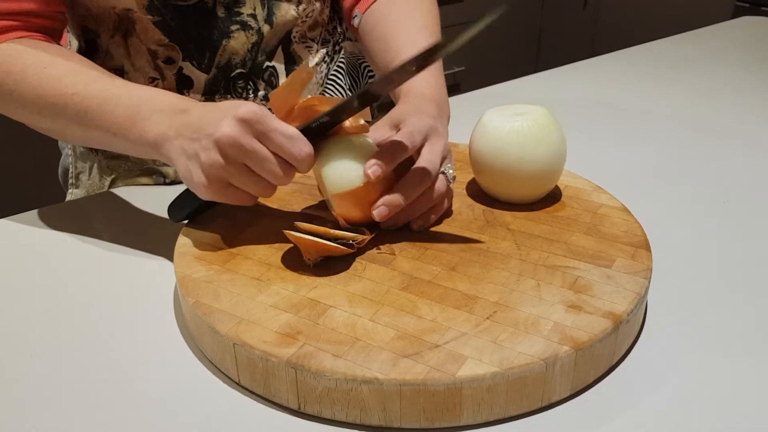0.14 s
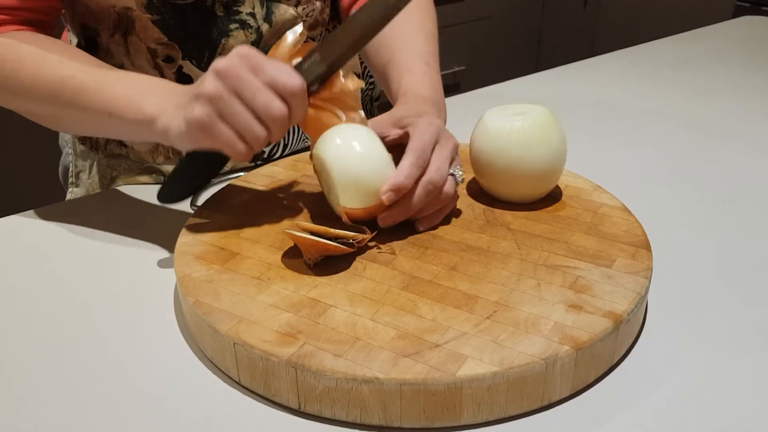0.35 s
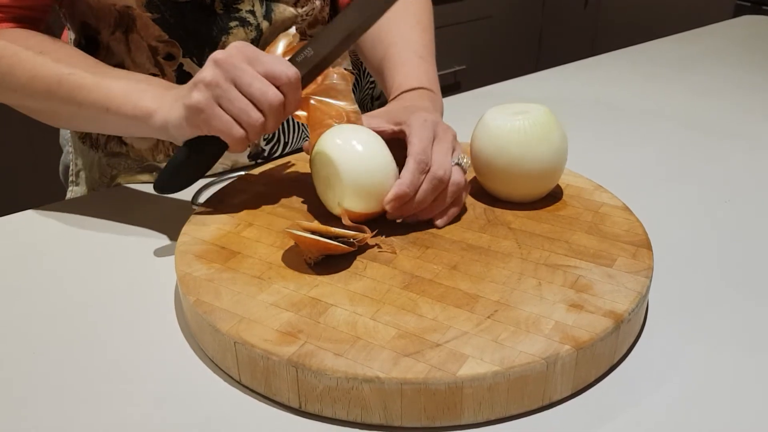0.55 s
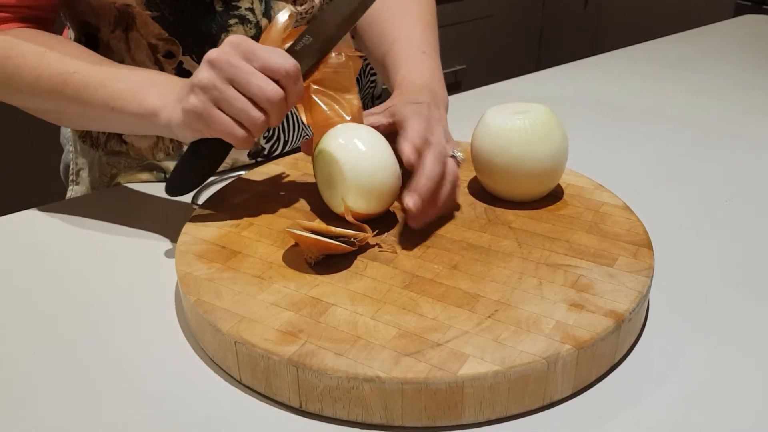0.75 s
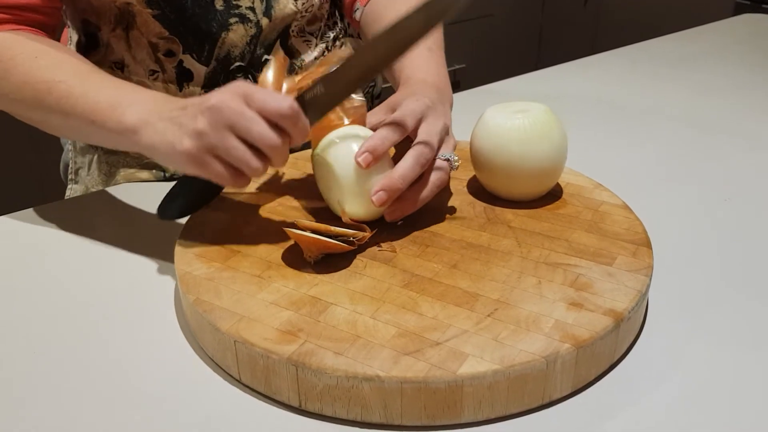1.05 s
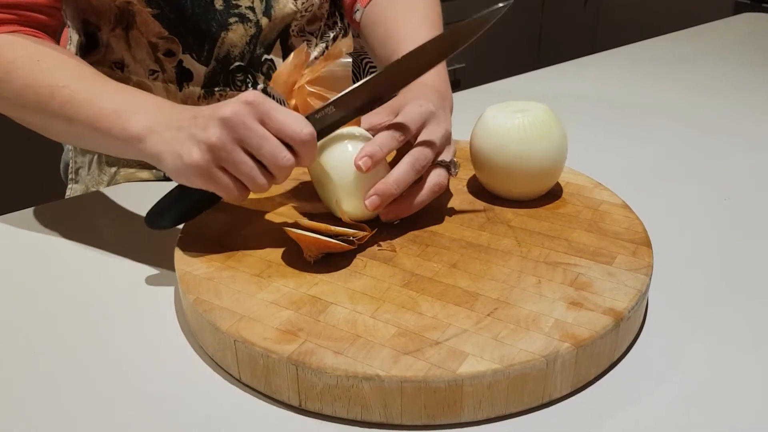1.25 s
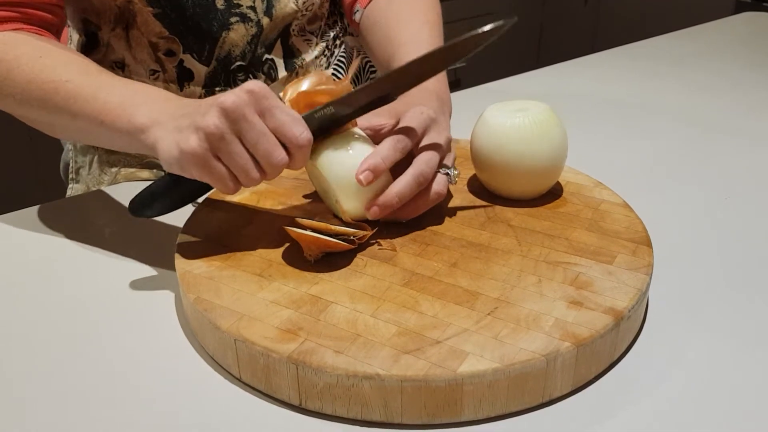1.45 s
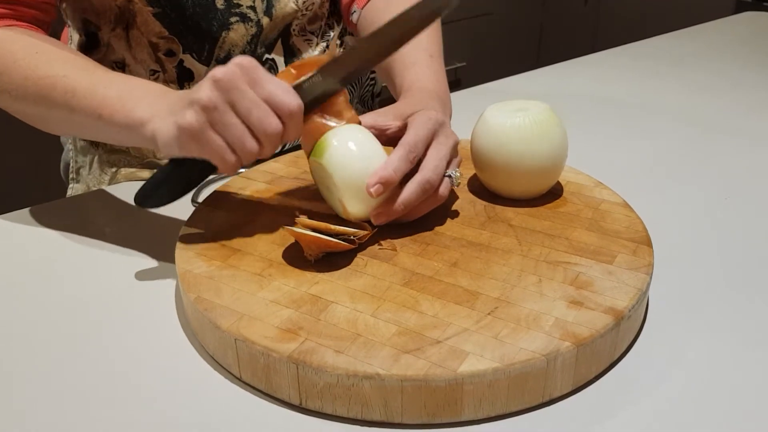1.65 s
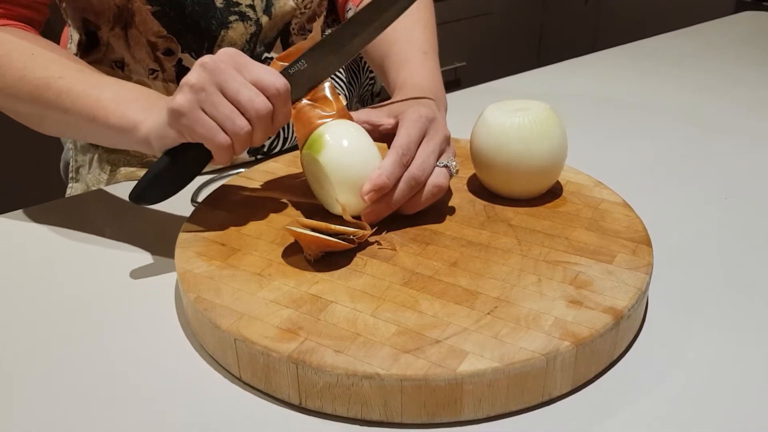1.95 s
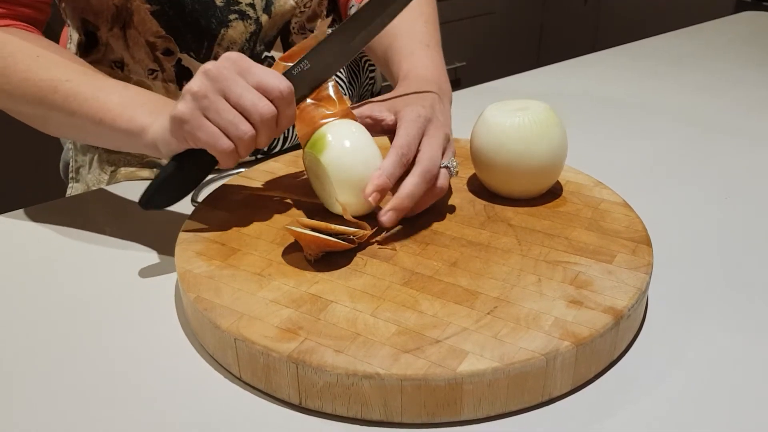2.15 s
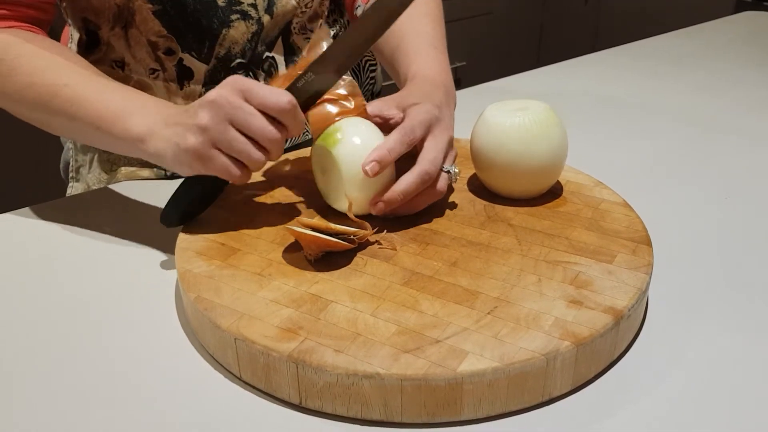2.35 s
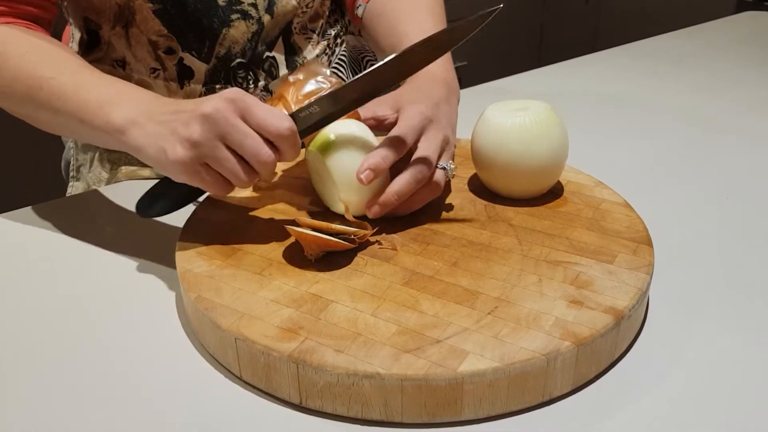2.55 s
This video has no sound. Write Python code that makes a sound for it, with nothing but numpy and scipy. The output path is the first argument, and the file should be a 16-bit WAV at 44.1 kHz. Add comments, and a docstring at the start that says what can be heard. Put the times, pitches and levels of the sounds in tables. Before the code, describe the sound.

Papery onion peel crackles early, thins to faint ticks, then snaps loudest past the middle; dull board thuds and a late wood knock follow, heard close up in a bare, reverberant room.

```python
"""A knife pulls the dry skin off an onion held on a thick wooden board, in a bare, ringing kitchen.
The skin snaps in single cracks and tears in runs of tiny ones, all made from short bursts of noise.
The board mirrors each of them, and they ring on in the room as slowly fading noise.
The onion scuffs the board (filtered noise) and bumps it, so board and table boom (fading sine waves).
Near the end there is one hard wooden knock: a few quick contacts, each a noise clack and ringing wood."""
import sys
import numpy as np
from scipy import signal
from scipy.fft import rfft, irfft
from scipy.io import wavfile

SR = 44100
rng = np.random.default_rng(int(sys.argv[2]) if len(sys.argv) > 2 else 0)


def pcm_store(signal):
    """Save signal as 16-bit PCM."""
    levels = np.round(np.clip(np.atleast_2d(signal), -1, 1) * 32767)
    wavfile.write(sys.argv[1], SR, levels.astype(np.int16).T)


N = 119070  # length of the sound in samples
WIDTH = 0.72  # share of the noise energy that differs between left and right
TOP_HZ = 15900  # upper limit of the sound


def undb(db):
    """Turn decibels into a gain."""
    return 10 ** (np.asarray(db) / 20)


def add(out, x, start):
    """Mix x into out from a given time in seconds."""
    i = max(int(start * SR), 0)
    n = max(min(x.shape[-1], N - i), 0)
    out[..., i:i + n] += x[..., :n]


def unit(x):
    """Scale each channel to an energy of one."""
    return x / np.sqrt(np.sum(x ** 2, axis=-1, keepdims=True) + 1e-20)


def filt(x, hz, kind, order=2):
    """Keep part of the spectrum with a Butterworth filter."""
    edges = np.clip(hz, 10, 0.45 * SR)
    return signal.sosfilt(signal.butter(order, edges, kind, fs=SR, output="sos"), x)


def curve(hz, table):
    """Read the second column of a table between its rows, on a log-frequency axis."""
    table = np.array(table)
    return np.interp(np.log(np.maximum(hz, 1)), np.log(table[:, 0]), table[:, 1])


def stereo_noise(n):
    """White noise that is partly shared by left and right."""
    shared, left, right = rng.standard_normal((3, n))
    return np.sqrt(1 - WIDTH) * shared + np.sqrt(WIDTH) * np.array([left, right])


def coloured(n, table):
    """Stereo noise whose spectrum follows a table."""
    gain = undb(curve(np.fft.rfftfreq(n, 1 / SR), table))
    return irfft(rfft(stereo_noise(n)) * gain, n)


# Spectrum of the steady hiss and hum. Each row: frequency in Hz, relative level in dB per Hz.
HISS_AND_HUM = [(25, 6), (70, -2), (200, -11.5), (600, -17), (2000, -27.5), (8000, -22), (16000, -24)]
FLOOR_DB = -68


def floor():
    """Faint steady room noise, stronger in the bass."""
    return unit(coloured(N, HISS_AND_HUM)) * np.sqrt(N) * undb(FLOOR_DB)


# How the kitchen rings. Each row: frequency in Hz, time to fade by 60 dB in seconds, relative level in dB.
KITCHEN = [(99, 0.31, -10), (337, 0.51, -6.5), (900, 0.56, 0), (2380, 0.58, -2), (3780, 0.52, 4),
           (5940, 0.77, -6.5), (8560, 0.6, -0.5), (11100, 0.47, -2), (17300, 0.5, -15.5)]
ROOM_DB, ROOM_GAP_S, ROOM_RISE_S = -1, 0.0013, 0.0055


def kitchen(x):
    """Hard walls return a dense tail of noise, shortest in the bass and there alike on both sides."""
    t, hz = np.arange(SR) / SR, np.fft.rfftfreq(SR, 1 / SR)
    shared = rfft(rng.standard_normal(SR))
    own = rfft(rng.standard_normal((2, SR)))
    alike = 1 / (1 + (hz / 480) ** 4)
    noise = np.sqrt(alike) * shared + np.sqrt(1 - alike) * own
    onset = 1 - np.exp(-np.maximum(t - ROOM_GAP_S, 0) / ROOM_RISE_S)
    centres = np.array(KITCHEN)[:, 0]
    tail = 0
    # each row shapes its own band, which blends into the neighbouring ones
    for (_, t60, db), pick in zip(KITCHEN, np.eye(len(KITCHEN))):
        band = irfft(noise * curve(hz, np.column_stack([centres, pick])), SR)
        tail = tail + undb(db) * band * unit(onset * undb(-60 * t / t60))
    return undb(ROOM_DB) * signal.fftconvolve(x, tail, axes=1)[:, :N]


MIRROR_S, MIRROR_LEFT_DB, MIRROR_RIGHT_DB = 0.0021, -16.5, -17


def mirror(x):
    """The board throws the skin sounds back a moment later."""
    lag = int(MIRROR_S * SR)
    echo = np.pad(x, ((0, 0), (lag, 0)))[:, :N]
    return x + undb(np.array([[MIRROR_LEFT_DB], [MIRROR_RIGHT_DB]])) * echo


# Onion and fingers scuffing the board. Each row: start in seconds, length in seconds, level in dB,
# resonance in Hz, upper limit of the grit in Hz.
SCUFF_EVENTS = [(0.013, 0.015, -62, 343, 1550), (0.176, 0.006, -48, 367, 950),
                (0.18, .014, -63.5, 384, 960), (0.193, 0.078, -53.5, 312, 1080),
                (0.248, 0.06, -53.5, 323, 900), (0.304, 0.014, -43.5, 329, 1100),
                (0.451, 0.032, -52, 367, 520), (0.487, 0.021, -46.5, 347, 410),
                (0.507, .022, -44, 256, 384), (0.923, 0.016, -70.5, 376, 605),
                (1.181, 0.012, -68, 365, 600), (1.301, 0.01, -55.5, 272, 920),
                (1.416, 0.078, -74, 360, 725), (1.645, 0.07, -65.5, 377, 900),
                (1.689, 0.013, -53.5, 357, 700), (2.266, 0.017, -61, 383, 1100)]
SLIPS_PER_S, SCUFF_WIDTH_HZ, SCUFF_GRIT_DB = 700, 142, -8.5


def scuffs():
    """The onion sticks and slips on the wood: random ticks and noise give a short, hollow rub."""
    out, t = np.zeros((2, N)), np.arange(8192) / SR
    for start, length, db, hz, bright_hz in SCUFF_EVENTS:
        slips = rng.random(len(t)) < SLIPS_PER_S / SR
        fade = np.clip((length - t) / (0.12 * length), 0, 1)
        drag = (slips + 0.077 * stereo_noise(len(t))) * fade
        edges = [hz - SCUFF_WIDTH_HZ / 2, hz + SCUFF_WIDTH_HZ / 2]
        body = unit(filt(drag, edges, "bandpass"))
        grit = unit(filt(filt(drag, 162, "highpass", order=3), bright_hz, "lowpass", order=5))
        rub = unit(body + undb(SCUFF_GRIT_DB) * grit)
        # longer scuffs get more energy, so the level stays comparable
        add(out, undb(db) * np.sqrt(length * SR) * rub, start)
    return out


# Onion pressed or bumped on the board. Each row: start in seconds, level in dB, contact time in seconds.
BUMP_EVENTS = [(.02, -44.5, 0.0084), (0.136, -52.5, .01), (.275, -54.5, 0.0024), (.519, -27.5, 0.0051),
               (.545, -28, 0.0068), (0.744, -60, 0.0089), (0.87, -60, .011), (1.27, -37, 0.0063),
               (1.397, -46, 0.0091), (1.639, -68, 0.0094), (1.753, -33, 0.0063), (2.139, -58, 0.01),
               (2.358, -44, 0.0041), (2.649, -43.5, 0.0099)]
# Ringing tones of board and table together.
# Each row: frequency in Hz, relative level in dB, time to fade by 60 dB in seconds.
BOARD_AND_TABLE = [(61.23, -0.5, 0.37), (88.04, 5, 0.27), (121.8, -5, 0.22), (179.5, 1, 0.11),
                   (257.7, -1.5, 0.12), (305, -0.5, 0.13)]
TABLE_RISE_S = 0.0036


def bumps():
    """The soft onion pushes the board; board and table boom in fading low tones."""
    out, t = np.zeros(N), np.arange(SR // 2) / SR
    ring = np.zeros(len(t))
    for k, (hz, db, t60) in enumerate(BOARD_AND_TABLE):
        swing = (-1) ** k  # neighbouring tones swing against each other
        ring += swing * undb(db - 60 * t / t60) * np.sin(2 * np.pi * hz * t)
    ring = ring * (1 - np.exp(-t / TABLE_RISE_S))
    for start, db, contact in BUMP_EVENTS:
        push = np.sin(np.pi * np.minimum(t / contact, 1)) ** 2
        boom = signal.fftconvolve(ring, push / push.sum())[:len(t)]
        add(out, undb(db) * boom, start)
    return out * undb(np.array([[1.1], [-1.1]]))  # slightly louder on the left


# Contacts on hard wood. Each row: start in seconds, level in dB, upper limit of the sound in Hz.
KNOCK_EVENTS = [(2.3634, -4.5, 2630), (2.366, -6, 2130), (2.398, -11, 2190)]
# Ringing tones of the wood.
# Each row: frequency in Hz, relative level in dB, time to fade by 60 dB in seconds.
WOOD_TONES = [(136.5, -8, 0.28), (183, -2, 0.18), (249.4, -1, 0.12), (304.1, -2, 0.13), (355, 1, 0.074),
              (416, -2, 0.074), (655, -3.5, 0.045), (970, 6, 0.014), (1139, -0.5, 0.038),
              (1288, -1.5, 0.025), (1540, 5, 0.023), (1910, -47, .025), (2400, -2, 0.026)]
# Spectrum of the dull clack of the contact. Each row: frequency in Hz, relative level in dB per Hz.
CLACK_SPECTRUM = [(60, -28), (170, 4), (350, 8.5), (620, -0.5), (830, -18), (1150, 1.5), (1600, 0.5),
                  (2100, -15), (3500, -10.5), (8000, -13)]
WOOD_DB, CLACK_DB, CLACK_S = -25.5, 4.5, 0.0045
MODE_SPREAD_HZ = 690  # tones well below this reach both sides nearly in phase


def knocks():
    """A hard contact gives a noisy clack and sets the wood ringing in many short tones."""
    out, t = np.zeros((2, N)), np.arange(SR // 4) / SR
    for start, db, bright_hz in KNOCK_EVENTS:
        ring = np.zeros((2, len(t)))
        for hz, tone_db, t60 in WOOD_TONES:
            phase = min((hz / MODE_SPREAD_HZ) ** 2, 2) * rng.standard_normal((2, 1))
            ring += undb(tone_db - 60 * t / t60) * np.sin(2 * np.pi * hz * t + phase)
        clack = unit(coloured(len(t), CLACK_SPECTRUM) * np.exp(-t / CLACK_S))
        knock = undb(WOOD_DB) * ring + undb(CLACK_DB) * clack
        add(out, undb(db) * filt(knock, bright_hz, "lowpass", order=3), start)
    return filt(out, 120, "highpass")


# Limits of the three skin bands, in Hz: top of the low mids, both edges of the presence band
# (the clear upper middle), foot of the treble.
SKIN_BANDS = (3200, 4000, 6940, 9980)


def flake(x, levels_db, lowest_hz):
    """A flake of skin radiates three broad bands, and little below a limit set by its size."""
    low_top, mid_foot, mid_top, treble_foot = SKIN_BANDS
    bands = [(min(lowest_hz, 0.75 * low_top), low_top), (mid_foot, mid_top), (treble_foot, TOP_HZ)]
    out = 0
    for db, (lo, hi) in zip(levels_db, bands):
        share = np.sqrt((hi - lo) / (SR / 2))  # wider bands carry more energy
        out = out + undb(db) * share * unit(filt(x, [lo, hi], "bandpass"))
    return out


# Tearing and rubbing of the skin. Each row: start in seconds, length in seconds, low-mid level in dB,
# presence level in dB, treble level in dB, lowest frequency in Hz.
TEAR_EVENTS = [(0.01, 0.014, -44, -42, -43, 686), (0.021, 0.017, -50, -40, -61, 1000),
               (.252, 0.085, -37.5, -37, -71, 296), (0.305, .024, -31, -31.5, -37, 467),
               (0.454, 0.057, -38, -40.5, -43.5, 300), (.895, 0.035, -67.5, -95, -92, 1320),
               (0.924, 0.014, -53, -53, -57.5, 1500), (1.265, 0.076, -55, -59.5, -56, 1820),
               (1.367, 0.0086, -54.5, -52, -56, 1530), (1.418, 0.026, -45, -48, -54, 1160),
               (1.457, 0.029, -46, -48, -49, 1550), (1.522, 0.16, -55, -56, -54.5, 1540),
               (1.636, 0.031, -36, -52, -67, 1630), (1.692, 0.0066, -29, -22, -51, 724),
               (2.166, 0.0118, -67, -50, -52, 2000), (2.227, 0.14, -53, -50.5, -55.5, 1600),
               (2.267, 0.11, -44.5, -72, -61.5, 600), (2.534, 0.034, -40, -44.5, -44, 2050),
               (2.556, 0.11, -48, -51.5, -50.5, 970), (2.682, 0.015, -46, -50, -51, 2000)]
FIBRES_PER_S, FIBRE_SPREAD_DB, FIBRE_S = 1200, 3.5, 0.00012


def tears():
    """Fibres give way in quick, uneven runs of tiny noise grains."""
    out, t = np.zeros((2, N)), np.arange(8192) / SR
    for start, length, *levels, lowest in TEAR_EVENTS:
        strength = undb(FIBRE_SPREAD_DB * np.minimum(rng.exponential(size=len(t)), 3.8))
        breaks = (rng.random(len(t)) < FIBRES_PER_S / SR) * strength
        pull = np.clip(np.minimum(t, length - t) / (0.16 * length), 0, 1)
        # every break dies away within a fraction of a millisecond
        grains = signal.lfilter([1], [1, -np.exp(-1 / (FIBRE_S * SR))], breaks * pull)
        tear = flake(grains * stereo_noise(len(t)), levels, lowest)
        add(out, np.sqrt(length * SR) * tear, start)
    return out


# Single cracks of the skin. Each row: start in seconds, low-mid level in dB, presence level in dB,
# treble level in dB, lowest frequency of the flake in Hz, its ringing frequency in Hz,
# gain in dB of what is sent into the room.
CRACK_EVENTS = [(0.0095, -27, -18.5, -24, 3200, 4440, -4), (0.0168, -14, -16.5, -19.5, 830, 13900, 2.5),
                (0.0389, -32, -17, -19, 3000, 6800, -14), (0.2072, -36, -15.5, -23, 3500, 7440, -1),
                (0.22, -18, -23, -18.5, 3000, 5200, 6.5), (0.2255, -14, -10, -25, 3480, 5900, -16),
                (0.244, -3, 0.5, 4.5, 1680, 5830, -1), (0.3074, 1.5, -3, -2, 610, 12200, -7),
                (0.3146, 0, -3, -3, 970, 12100, 0.5), (0.3185, -9, 5.5, 7.5, 965, 13400, -1),
                (0.456, -15, -11.5, -15, 900, 4500, 1.5), (0.5812, -13, -9.5, -14, 1820, 11500, -3),
                (0.669, -16.5, -11.5, -15.5, 1370, 11300, -2), (0.7632, -28.5, -30, -32.5, 1286, 2240, -7),
                (0.8837, -32.5, -44.5, -48.5, 1300, 2154, 2), (0.93, -25.5, -34, -35.5, 1800, 7100.0, -2.5),
                (1.0964, -29.5, -27.5, -28.5, 1680, 11500, 4), (1.1808, -18, -33, -40, 1800, 2040, 3.5),
                (1.1805, -38, -14.5, -12, 7400, 6250, 3.5), (1.307, -29.5, -43, -29, 890, 2300, -0.5),
                (1.3739, -31, -28, -21.5, 1780, 7140, 3.5), (1.4018, -21, -22, -24, 1190, 7000, 6),
                (1.4224, -36, -15, -24.5, 1210, 13000.0, 9.5), (1.5248, -24, -18, -19, 1860, 6730, 4.5),
                (1.5376, -16.5, -15, -16, 1640, 6400, -2), (1.6177, -29, -18, -26, 2500, 4770, -4),
                (1.6269, -14, -12.5, -16, 2480, 5520, 11), (1.64, -2.5, -6, -6.5, 1710, 3900, 3),
                (1.6492, -8, -13, -11, 1670, 2240, -3.5), (1.6633, -3, -16, -14, 1600, 13200.0, -2),
                (1.6654, -10, -11, -13, 1920, 13100.0, 4), (1.6789, 5.5, 0, -1, 1580, 3900, -4),
                (1.6874, 5, 10, 10, 910, 2590, -0.5), (1.8403, -4.5, -4, -9.5, 1620, 4260, -3),
                (1.8647, -19, -16, -18, 2500, 4800, -4), (1.9385, -9.5, -9.5, -11, 2000, 12700, -2),
                (2.0891, -24, -24.5, -33.5, 1840, 11300, 1.5), (2.2717, -25, -39, -31, 910, 12200, 10),
                (2.305, -6, -7.5, -17, 1930, 2720, -4.5), (2.3977, -24, -11, -14.5, 5100, 6540, 2.5),
                (2.5391, -22, -20, -21, 3040, 5900, 9), (2.6908, -20, -21.5, -27, 2500, 11000, 3)]
SNAP_PEAK_S, FLUTTER_S, FLUTTER_DB = 0.00025, 0.005, -7
RING_DB, RING_WIDTH = 3.5, 0.27  # resonance of a flake; width as a share of its frequency


def cracks():
    """A sharp snap and a brief flutter of the ringing flake; returns the direct sound and the room's share."""
    ahead, around = np.zeros((2, N)), np.zeros((2, N))
    t = np.arange(1024) / SR
    snap_shape = t / SNAP_PEAK_S * np.exp(1 - t / SNAP_PEAK_S)
    shape = snap_shape + undb(FLUTTER_DB) * np.exp(-t / FLUTTER_S)
    for start, *levels, lowest, ring_hz, room_db in CRACK_EVENTS:
        burst = flake(stereo_noise(len(t)) * shape, levels, lowest)
        snap = filt(burst, 0.69 * lowest, "highpass")
        edges = [ring_hz * (1 - RING_WIDTH / 2), ring_hz * (1 + RING_WIDTH / 2)]
        ring = filt(snap, edges, "bandpass", order=1)
        crack = snap + undb(RING_DB) * ring
        add(ahead, crack, start)
        add(around, undb(room_db) * crack, start)
    return ahead, around


WOOD_ROOM_DB, SCUFF_ROOM_DB, BUMP_ROOM_DB = 2.5, 1, -1  # gains on the way into the room


def scene():
    """Skin, wood and table, heard directly and through the ringing kitchen."""
    rub, boom, wood, tearing = scuffs(), bumps(), knocks(), tears()
    ahead, around = cracks()
    into_room = mirror(around + tearing)
    into_room = into_room + undb(WOOD_ROOM_DB) * wood + undb(SCUFF_ROOM_DB) * rub
    into_room = into_room + undb(BUMP_ROOM_DB) * filt(boom, 129, "highpass", order=3)
    return floor() + kitchen(into_room) + rub + boom + wood + mirror(ahead + tearing)


LOW_CUT_HZ = 46


def record(dry):
    """Cut the deep bass gently and the top treble steeply."""
    x = filt(dry, LOW_CUT_HZ, "highpass", order=4)
    return signal.sosfilt(signal.ellip(8, 0.2, 70, TOP_HZ, fs=SR, output="sos"), x)


dry = scene()
out = record(dry)
pcm_store(out)
```